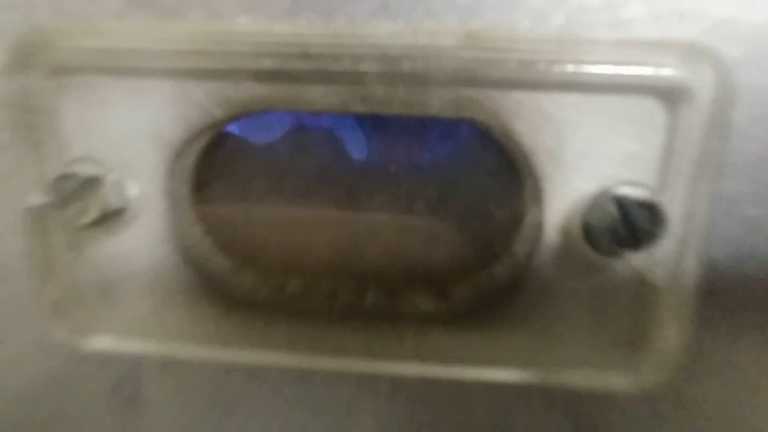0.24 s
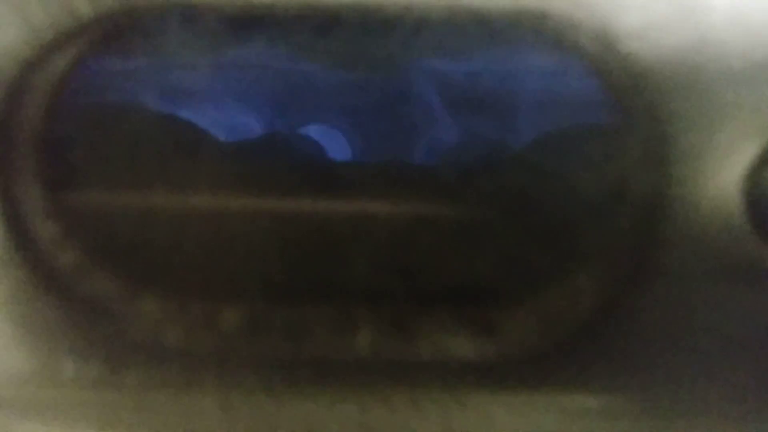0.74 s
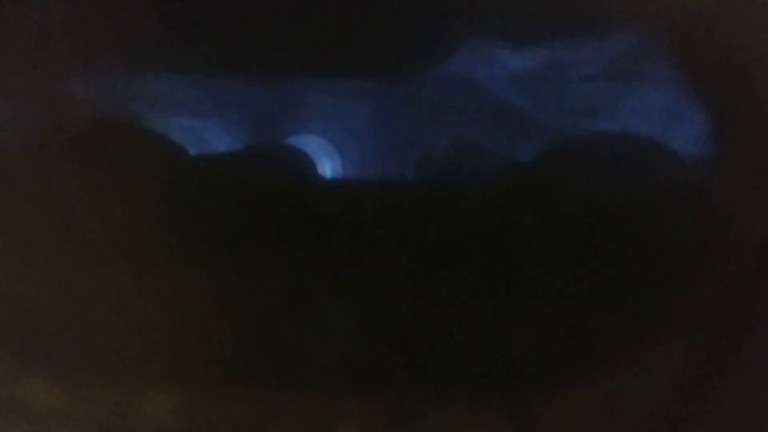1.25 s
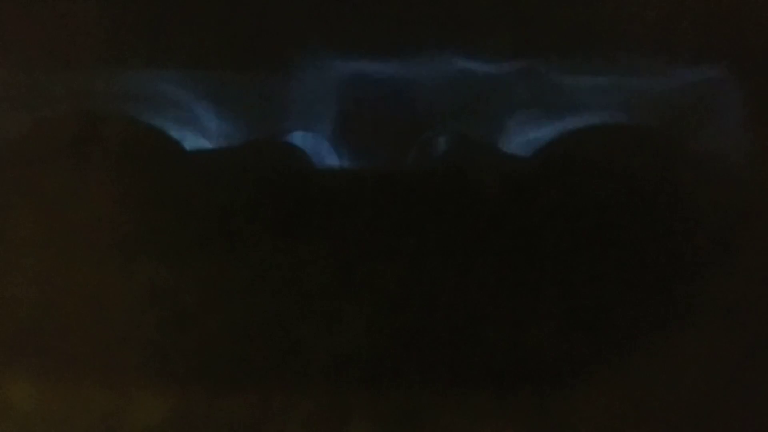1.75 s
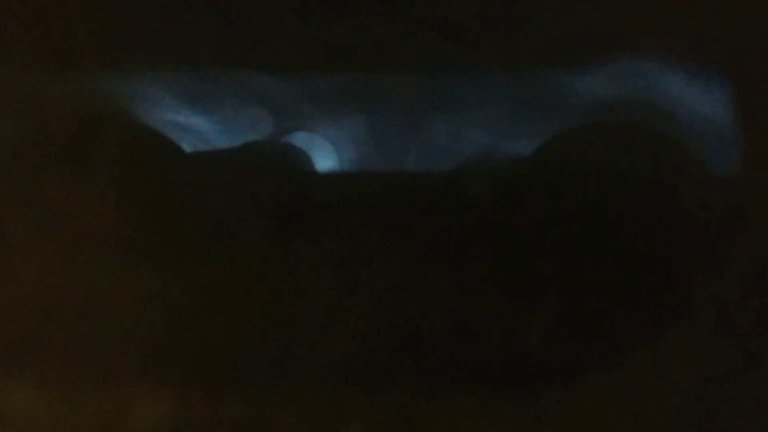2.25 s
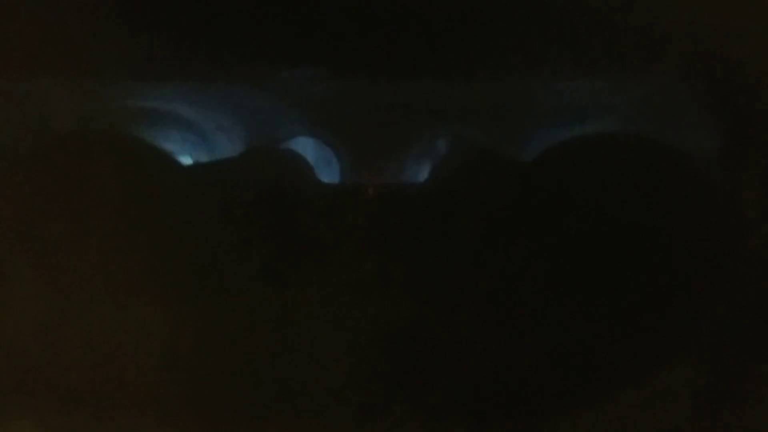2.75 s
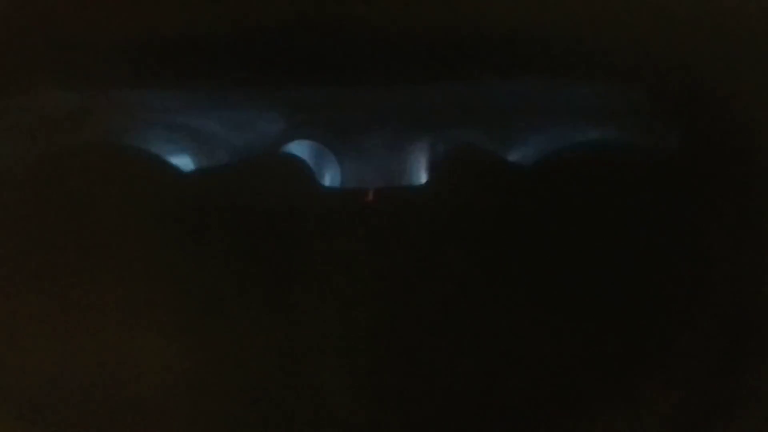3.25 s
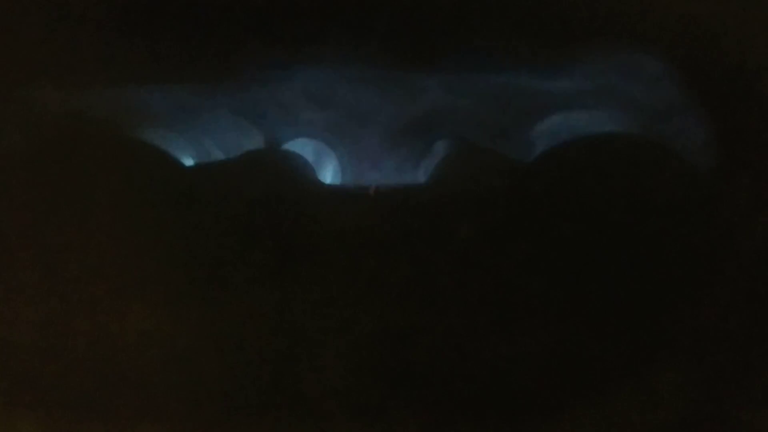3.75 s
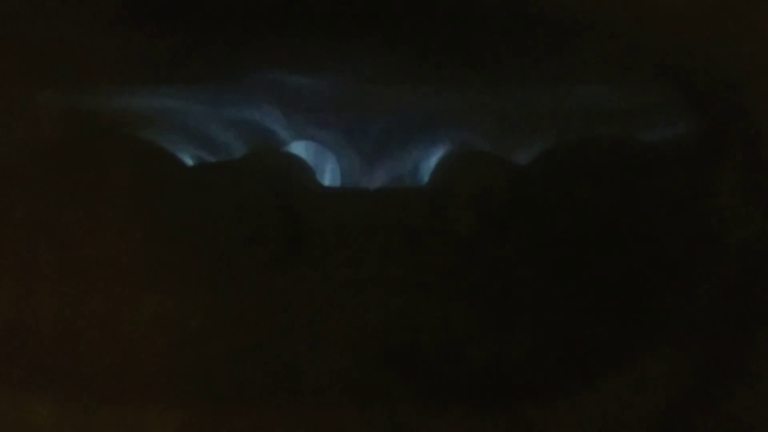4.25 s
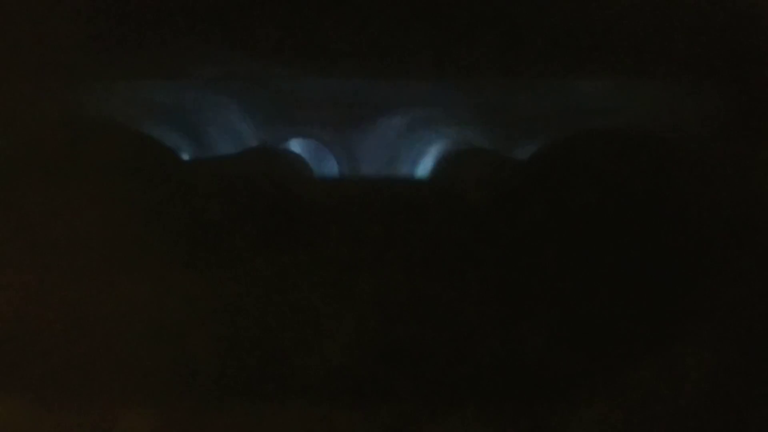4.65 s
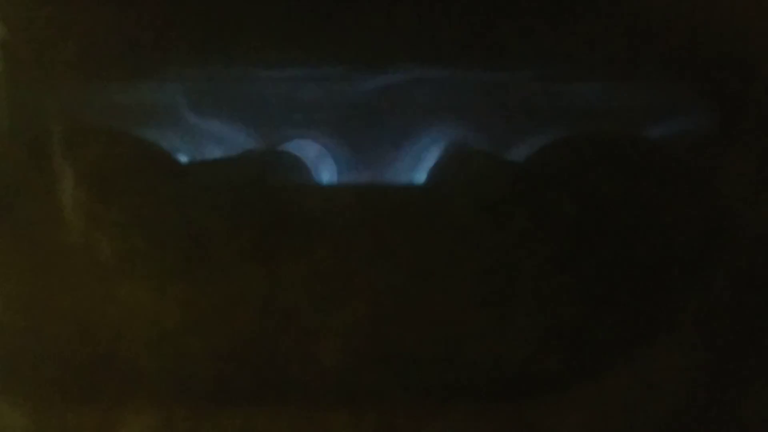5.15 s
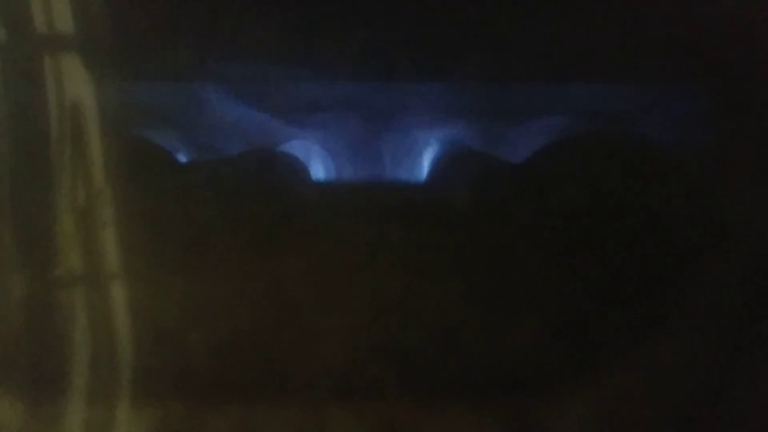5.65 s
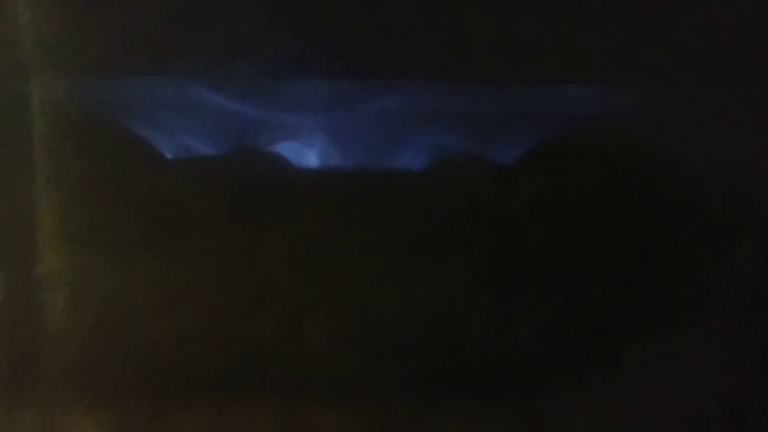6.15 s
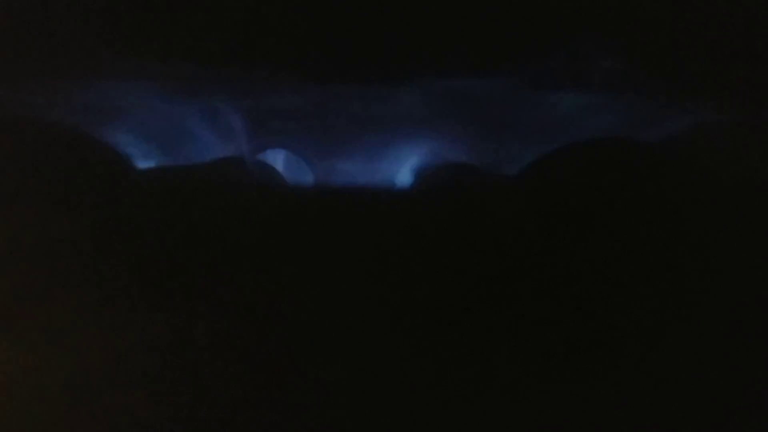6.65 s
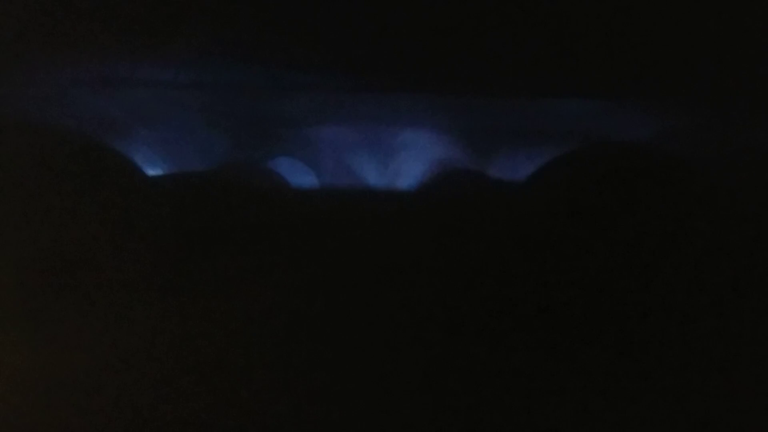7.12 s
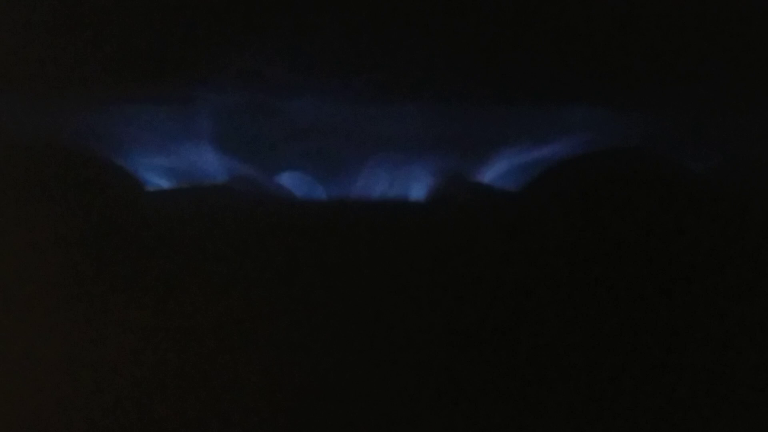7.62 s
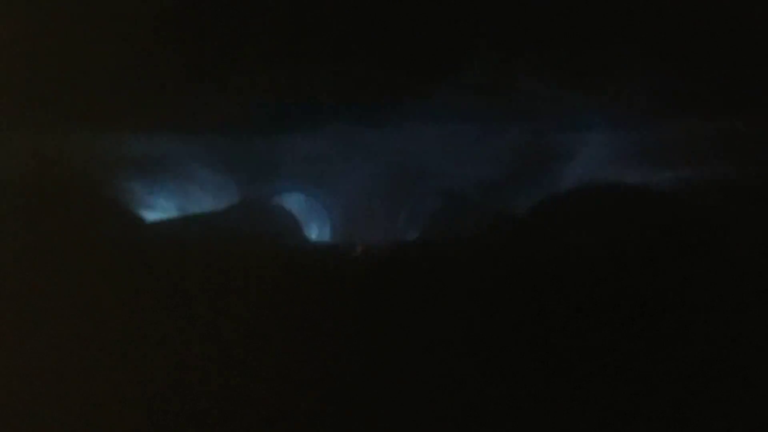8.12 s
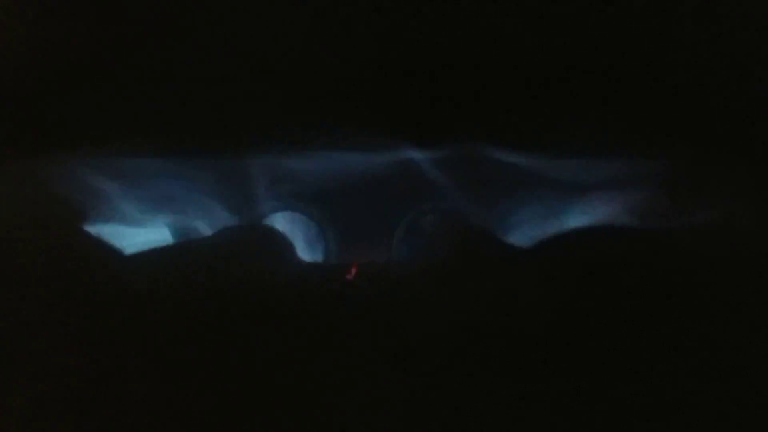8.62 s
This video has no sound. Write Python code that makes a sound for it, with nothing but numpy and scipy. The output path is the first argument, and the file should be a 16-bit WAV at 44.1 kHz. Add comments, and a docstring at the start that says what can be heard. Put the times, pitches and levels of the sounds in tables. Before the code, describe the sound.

From 0 seconds a gas furnace is in full run indoors, heard close at its sight glass: low, uneven flame rumble, rushing air, gas hiss and a steady blower whine around 610 Hz with a 120 Hz hum. Deep throbs swell at the very start. Over the first second the microphone moves in, the air rush growing louder while a brighter surface hiss fades; faint cloth strokes pass between about 0.7 and 1.9. Short booming flare-ups keep coming, notable near 1, 1.4, 2.2, 4.2 and 7.6. A narrow hollow boom is stronger around 5 to 7, dipping briefly near 5.6, then drops away. From about 5.5 the jets and rush dull a little, with light rubs at 5.7 and 6.9. A clearer cluster of soft sleeve rustles comes at 7.2 to 7.7, then a heavy throb near 8.1. The fire continues until an abrupt end near 8.9.

```python
"""Low flame rumble, rushing air, gas hiss and a blower whine start together: a furnace heard at its sight glass.
Flames, draught and jets are shaped noise ringing in the sheet-metal cabinet, with deep throbs as swelling sines.
The inducer blower adds shaken sines at its blade rate and motor hum; soft strokes of noise, as of a sleeve,
brush past the microphone. Colour and balance shift as the microphone moves."""
import sys
import numpy as np
from scipy import signal
from scipy.fft import rfft, irfft
from scipy.io import wavfile
from scipy.ndimage import uniform_filter1d, minimum_filter1d

SR = 44100
rng = np.random.default_rng(int(sys.argv[2]) if len(sys.argv) > 2 else 0)


def inscribe(sig):
    """Save sig as 16-bit PCM at rate SR to the path in sys.argv[1].

    A 1-D sig is mono; a 2-D sig holds one channel per row.
    Samples are clipped to [-1, 1] before scaling.
    """
    pcm = np.round(np.clip(np.atleast_2d(sig).T, -1, 1) * 32767)
    wavfile.write(sys.argv[1], SR, pcm.astype(np.int16))


N = 391608
TIME = np.arange(N) / SR
HZ = np.fft.rfftfreq(N, 1 / SR)


def gain_of(db):
    """Decibels to amplitude."""
    return 10 ** (np.asarray(db) / 20)


def evened(x):
    """Scales to rms 1."""
    return x / np.sqrt(np.mean(x ** 2) + 1e-20)


def read(points, hz):
    """Reads a spectrum table along a log-frequency axis."""
    point_hz, value = np.transpose(points)
    return np.interp(np.log(hz + 1), np.log(point_hz + 1), value)


def follow(rows):
    """Draws each column of a time table as a line over every sample."""
    point_s, *columns = np.transpose(rows)
    return [np.interp(TIME, point_s, column) for column in columns]


def spread(pan_db):
    """Left and right gains whose mean is 1; positive pan leans left."""
    pair = np.array([gain_of(pan_db / 2), gain_of(-pan_db / 2)])
    return pair / pair.mean(0)


def eddies(rate_hz):
    """Random wavering of rms 1: noise dulled above the given rate."""
    noise = rng.standard_normal(N)
    return evened(irfft(rfft(noise) / (1 + (HZ / rate_hz) ** 2), N))


def split(x, hz):
    """Steep crossover: the parts below and above a frequency add up to the whole."""
    low = irfft(rfft(x) / (1 + (HZ / hz) ** 20), N)
    return low, x - low


def surging(x, level_db, span_s):
    """Levels noise by its own smoothed power, then rides it in dB; flutter faster than the span survives."""
    window = signal.windows.hann(int(span_s * SR) * 2)
    power = signal.fftconvolve(x.mean(0) ** 2, window / window.sum(), "same")
    return x / np.sqrt(abs(power) + 1e-9) * gain_of(level_db)


# resonances of cabinet, heat exchanger and flue: centre_hz, width_hz, lift_db
CABINET_RESONANCES = [(70.5, 11, 5.5), (191, 18, 5), (225.7, 46, 6.5), (297.3, 34, 6.5), (359, 31.4, 6.5),
                      (638.7, 17, 8), (663, 20, 9.5), (699, 22, 8), (762, 68, 3), (858, 51.6, 6),
                      (1024, 71, 5.5), (1200, 12, 6.5), (1234.6, 39, 8), (1355, 62, 6), (1688, 44, 6),
                      (1763, 68, 4), (1970, 220, 2.5), (2308, 65, 4), (3080, 59, 2.5)]
# how alike the two microphone ports hear: frequency_hz, likeness (1 = identical)
PORT_LIKENESS = [(30, 1), (80, 0.85), (360, 0.93), (420, 0.32), (520, 0.88), (620, 0.91), (850, 0.63),
                 (1100, 0.19), (1500, 0.31), (2000, 0.1), (5000, .1), (16000, .1)]
# how far the left port leads: frequency_hz, lead_radians
PORT_LEAD = [(30, -0.5), (70, -0.24), (150, -0.06), (500, 0.5), (850, -0.4), (1050, 2), (1200, 0.5),
             (1400, 3), (1650, 3.5), (3000, 1), (6000, 1)]
# width is taken at half the lift in dB
RING_DB = sum(lift_db * .5 ** ((2 * (HZ - centre_hz) / width_hz) ** 2)
              for centre_hz, width_hz, lift_db in CABINET_RESONANCES)


def flow(spectrum, pan_db):
    """Turbulent noise rings the cabinet and reaches two ports, more alike in the bass than in the treble."""
    a, b, c, d = rng.standard_normal((4, len(HZ)))
    likeness = np.clip(read(PORT_LIKENESS, HZ), -1, 1)
    left = a + 1j * b
    stranger = c + 1j * d
    right = likeness * left + np.sqrt(1 - likeness ** 2) * stranger
    right = right * np.exp(-1j * read(PORT_LEAD, HZ))
    colour = gain_of(read(spectrum, HZ) + RING_DB)
    ports = irfft(np.array([left, right]) * spread(pan_db) * colour, N)
    return ports / np.std(ports.mean(0))  # the mean of both ports has rms 1


# left minus right across the spectrum, shared by flames, draught and fizz: frequency_hz, pan_db
PORT_BALANCE = [(60, 5), (92, 3.5), (140, 6.5), (210, 5), (330, 3), (500, 3.5), (770, 3.5), (1170, 5.5),
                (1790, -0.5), (2740, 5), (4190, -3), (6410, 0), (9810, 8.5), (15000, -1.5)]
# relative colour of the fire: frequency_hz, density_db (per Hz)
FLAME_SPECTRUM = [(20.0, -44.5), (32.0, -40.5), (45.0, -23), (56.0, -6.5), (70.0, -8), (112, -2.5),
                  (130, -7.5), (155, -5.5), (210.0, -16), (270.0, -19.5), (390.0, -14), (460.0, -22),
                  (560.0, -23), (900.0, -52.5), (2000.0, -95.5), (5000, -140)]
# drift of the fire, band by band: time_s, rumble_db, body_db, upper_body_db, roar_db
FIRE_LEVEL_DRIFT = [(0.0, -24, -24.5, -28.5, -27), (0.7, -26, -24.5, -25, -27.5),
                    (1.15, -25, -24.5, -23.5, -27), (2.1, -23.5, -23.5, -25, -27),
                    (3.0, -24, -22, -23, -26), (4.3, -24.5, -24, -24, -27.5), (4.75, -24, -24, -22.7, -27),
                    (4.95, -28, -27, -25, -25.5), (5.2, -25, -28, -22.5, -27),
                    (5.9, -23, -22.3, -25, -26.2), (6.6, -25, -22, -23, -27.5),
                    (6.87, -24.5, -22.5, -25.5, -27.5), (6.95, -24, -30, -22, -26.5),
                    (7.05, -24.5, -20, -22.5, -25.5), (7.35, -22.5, -23.5, -24.5, -27.5),
                    (7.7, -22, -19.5, -19.5, -26.5), (8.1, -24, -20, -22, -27),
                    (8.88, -21.3, -18.5, -25.5, -29.5)]
# flames flare up and boom in the heat exchanger: peak_s, lift_db
FLARE_UPS = [(.79, 8.5), (1.01, 10), (1.42, 9), (1.54, 4), (1.73, 4.5), (2.16, 10.5), (2.93, 4.5),
             (3.04, 5.5), (3.47, 7), (3.81, 4), (4.25, 11), (5.09, 6), (5.28, 3), (6.29, 3), (6.68, 4),
             (7.57, 9), (7.89, 4), (8.35, 3.5), (8.48, 3.5)]
# relative colour of the exchanger's narrow boom: frequency_hz, density_db (per Hz)
BOOM_SPECTRUM = [(60, -65.5), (105, -31), (121, -10), (130, 3), (136, -0.5), (148, -8.5), (170, -31.5),
                 (300, -79.5), (1000, -140)]
# level of the boom before flares, falling away for about a second: time_s, level_db
BOOM_LEVEL_DRIFT = [(0, -27.5), (.6, -25.5), (1.4, -22), (2.4, -24), (2.9, -21.5), (3.4, -22.5), (4.0, -22),
                    (4.9, -21), (5.1, -18.5), (5.4, -17), (5.65, -32), (5.85, -19), (6.1, -27), (6.3, -17),
                    (6.85, -17), (6.96, -39), (8.05, -34), (8.3, -20), (8.88, -26)]


def flames(rumble_hz=88, body_hz=148, roar_hz=260, surge_s=0.16, surge_hz=7, flare_half_width_s=0.024,
           low_surge_db=1.1, roar_surge_db=0.33, boom_surge_db=1.5, boom_pan_db=8):
    """Combustion noise surges apart in four bands; a narrow exchanger boom joins, and flares lift it and the body."""
    rumble_db, body_db, upper_db, roar_db = follow(FIRE_LEVEL_DRIFT)
    boom_db, = follow(BOOM_LEVEL_DRIFT)
    flare_db = sum(lift_db * np.exp(-((TIME - peak_s) / flare_half_width_s) ** 2)
                   for peak_s, lift_db in FLARE_UPS)
    rumble, rest = split(flow(FLAME_SPECTRUM, read(PORT_BALANCE, HZ)), rumble_hz)
    body, rest = split(rest, body_hz)
    upper, roar = split(rest, roar_hz)
    boom = flow(BOOM_SPECTRUM, np.full(len(HZ), boom_pan_db))
    parts = [(rumble, rumble_db, low_surge_db),
             (body, body_db + flare_db, low_surge_db),
             (upper, upper_db, low_surge_db),
             (roar, roar_db, roar_surge_db),
             (boom, boom_db + flare_db, boom_surge_db)]
    return sum(surging(part, level_db + depth_db * eddies(surge_hz), surge_s)
               for part, level_db, depth_db in parts)


# deep throbs of the fire, rms level at the crest before panning: crest_s, half_width_s, level_db
FIRE_THROBS = [(.05, .05, -22), (.17, 0.044, -18), (.32, 0.045, -19), (1.13, 0.049, -18), (1.61, .05, -18),
               (2.01, 0.11, -19), (2.54, 0.066, -21.5), (3.04, 0.039, -19), (3.43, 0.044, -21),
               (3.88, .06, -21), (6.03, 0.081, -20), (6.23, .04, -16), (6.59, .07, -19.5), (8.07, .07, -15)]


def throbs(throb_hz=72, pan_db=4.3):
    """A surge of the fire sets the lowest cabinet resonance swinging: a sine under a bell-shaped swell."""
    out = np.zeros(N)
    phases = rng.random(len(FIRE_THROBS))  # in turns
    for (crest_s, half_width_s, level_db), phase in zip(FIRE_THROBS, phases):
        swell = gain_of(level_db) * np.exp(-((TIME - crest_s) / half_width_s) ** 2)
        out += swell * np.sqrt(2) * np.sin(2 * np.pi * (throb_hz * TIME + phase))
    return spread(pan_db)[:, None] * out


# relative colour of the drawn air: frequency_hz, density_db (per Hz)
DRAUGHT_SPECTRUM = [(350.0, -61), (560.0, -16.5), (620.0, -0.5), (730.0, -5.5), (1250.0, -6), (1450.0, -8),
                    (1800.0, -16.5), (2500.0, -32.5), (6000.0, -81)]
# air rush before its trim, loudest with the microphone right at the glass: time_s, level_db
RUSH_LEVEL = [(0.0, -29.5), (0.55, -28.5), (1.0, -24.5), (1.7, -24), (4.0, -24.5), (5.3, -25), (6.1, -28),
              (7.2, -26.5), (8.88, -26.5)]


def draught(trim_db=2.0, flue_hz=740, flue_db=-25.5):
    """Air drawn through the cabinet: low flue noise holds level while the upper rush depends on where one stands."""
    rush_db, = follow(RUSH_LEVEL)
    flue, rush = split(flow(DRAUGHT_SPECTRUM, read(PORT_BALANCE, HZ)), flue_hz)
    return flue * gain_of(flue_db) + rush * gain_of(rush_db + trim_db)


# relative colour of the burner jets: frequency_hz, density_db (per Hz)
JET_SPECTRUM = [(700.0, -37.5), (1400.0, -3.5), (1900.0, 1), (2700.0, -1.5), (3500.0, -13.5),
                (4500.0, -25.5), (9000.0, -61), (11500, -60.5), (14000, -47), (16000, -46.5)]
# jets before their trim, shaded once the microphone shifts aside: time_s, level_db, pan_db (left minus right)
JET_LEVEL_DRIFT = [(0.0, -37, 4), (.6, -38, 7), (1.0, -36, 6.5), (3.3, -36, 6), (4.8, -36.5, 5.6),
                   (5.35, -36.5, 5.4), (5.7, -39, -2), (7.1, -39.5, 0.5), (7.7, -40.5, 6), (8.4, -40, 3),
                   (8.88, -39.5, 4)]
# relative colour of the fine gas hiss: frequency_hz, density_db (per Hz)
FIZZ_SPECTRUM = [(1500.0, -43), (3500.0, 0), (4500.0, -4), (6000.0, -5.5), (7500.0, -12), (8500.0, -20),
                 (10000.0, -39.5), (12000.0, -36), (14000.0, -29.5), (16000.0, -28.5)]
# gains of the fizz before its wavering: time_s, lower_and_middle_db, top_db
FIZZ_LEVEL_DRIFT = [(0, -52.5, -53), (1, -48.5, -49), (2.6, -50.5, -50), (3.7, -49.5, -48),
                    (4.5, -49.5, -49.5), (5.3, -49.5, -48.5), (6.2, -49.5, -52), (7, -48.5, -50),
                    (8.0, -49.5, -51.5), (8.75, -51, -49.5)]
# relative colour of the brighter hiss in front of the panel: frequency_hz, density_db (per Hz)
PANEL_SPECTRUM = [(1900, -30), (2500, 4), (2900, 7.5), (3300, 3.5), (3900, 4.5), (4700, -9), (6000, -20.5),
                  (7700, -10), (10000, -36), (12500, -28), (16000, -25.5)]
# panel hiss before gusts, fading as the microphone reaches the glass: time_s, level_db
PANEL_LEVEL_DRIFT = [(0, -42.5), (.6, -45), (1.3, -47.5), (1.6, -71.5), (8.88, -83.5)]


def jets(trim_db=2, gust_db=0.59, gust_hz=12, panel_pan_db=7, shade_hz=2450, shade_share=.4,
         fizz_split_hz=4600, top_split_hz=6800, waver_db=0.9, waver_hz=5):
    """Gas hisses out of the orifices, gusting as a whole, while each band of its fine fizz wavers on its own."""
    level_db, pan_db = follow(JET_LEVEL_DRIFT)
    centred = np.zeros(len(HZ))
    dull, bright = split(flow(JET_SPECTRUM, centred), shade_hz)
    shade_db = shade_share * (level_db - level_db.max())  # the bright part is shaded most
    body = (dull + bright * gain_of(shade_db)) * spread(pan_db) * gain_of(level_db + trim_db)

    low, rest = split(flow(FIZZ_SPECTRUM, read(PORT_BALANCE, HZ)), fizz_split_hz)
    middle, top = split(rest, top_split_hz)
    fizz_db, top_db = follow(FIZZ_LEVEL_DRIFT)
    bands = [(low, fizz_db), (middle, fizz_db), (top, top_db)]
    fizz = sum(band * gain_of(band_db + waver_db * eddies(waver_hz)) for band, band_db in bands)

    panel_db, = follow(PANEL_LEVEL_DRIFT)
    panel = flow(PANEL_SPECTRUM, centred + panel_pan_db) * gain_of(panel_db)
    return (body + fizz + panel) * gain_of(gust_db * eddies(gust_hz))


# tones of 11 blades and 18 rotor bars, level before the blower drift, shading and panning:
# shaft_order, mains_order, level_db, flutter_share
BLOWER_TONES = [(11, 0, -23.5, 0.15), (22, 0, -47.5, 0.82), (0, 2, -34.5, 0.12), (0, 8, -47, 0.075),
                (0, 10, -42.5, 0.11), (18, -2, -40.5, 0.6), (18, 0, -41.5, 0.33), (19, 0, -50.5, 0.17),
                (18, 2, -38.5, 0.31), (19, 2, -43, 0.6), (18, 4, -50.5, .2)]
# drift applied to all the tones: time_s, offset_db
BLOWER_LEVEL_DRIFT = [(0, 0.29), (1.2, 0.62), (3, 0.2), (5, 0.31), (6.2, -0.52), (7.5, -0.94),
                      (8.88, -0.73)]


def blower(shaft_hz=55.56, mains_hz=60, flutter_hz=9, pan_db=8.0, shade_share=0.48, shade_above_hz=800):
    """Blade tones and magnetic hum at constant speed; eddies at the wheel shake each tone in level and phase."""
    out = np.zeros(N)
    # high tones come through the glass, fading with the air rush when the microphone moves aside
    rush_db, = follow(RUSH_LEVEL)
    shade = gain_of(shade_share * (rush_db - rush_db.mean()))
    for shaft_order, mains_order, level_db, flutter_share in BLOWER_TONES:
        pitch_hz = shaft_order * shaft_hz + mains_order * mains_hz
        shake = 1 + flutter_share * (eddies(flutter_hz) + 1j * eddies(flutter_hz))
        carrier = np.exp(2j * np.pi * (pitch_hz * TIME + rng.random()))
        tone = evened((shake * carrier).real)
        out += gain_of(level_db) * tone * (shade if pitch_hz > shade_above_hz else 1)
    offset_db, = follow(BLOWER_LEVEL_DRIFT)
    return spread(pan_db)[:, None] * out * gain_of(offset_db)


# soft strokes, as of a sleeve, gains at full speed before catching:
# middle_s, length_s, hiss_db, centre_hz, air_db, pan_db (left minus right)
SLEEVE_BRUSHES = [(.8, .28, -51, 5000, -73, -5), (1.33, .08, -58, 7000, -62, 8),
                  (1.39, .16, -50, 5800, -72, -5), (1.497, .2, -49, 5700, -65, -7),
                  (1.8, .14, -57, 5600, -79, -3), (5.65, .14, -51, 3700, -80, 0),
                  (5.8, .1, -50, 3800, -80, -3), (6.92, .18, -54, 4400, -77, 2),
                  (7.323, 0.23, -44.5, 5030, -64, -4), (7.448, 0.27, -47, 4100, -66, -3),
                  (7.49, 0.33, -42.5, 6400, -49, 0), (7.59, .08, -43, 5300, -58, -3),
                  (7.63, 0.23, -45, 6600, -50, 1)]
# relative colour of the rubbing cloth: frequency_ratio (times the stroke's centre_hz), density_db (per Hz)
CLOTH_HISS_SPECTRUM = [(.3, -43), (.55, -8.5), (.75, -5.5), (1, 0), (1.2, -6), (1.42, -16.5), (1.65, -32),
                       (2.5, -59)]
# relative colour of the cloth's airy top: frequency_hz, density_db (per Hz)
CLOTH_AIR_SPECTRUM = [(6000, -44.5), (9000, -13.5), (10400, -22.5), (12200, -9), (13500, -5), (15200, 1.5),
                      (16000, -3.5)]


def sleeve(air_pan_db=5.0, hiss_power=1.5, air_power=1.4, catch_db=1.0, catch_hz=30):
    """Cloth speeds up, slows and catches unevenly; strokes hiss at their own pitch, airy top opening with speed."""
    air = flow(CLOTH_AIR_SPECTRUM, np.full(len(HZ), air_pan_db))
    out = np.zeros((2, N))
    for middle_s, length_s, hiss_db, centre_hz, air_db, pan_db in SLEEVE_BRUSHES:
        at = np.flatnonzero(abs(TIME - middle_s) < length_s / 2)
        speed = abs(np.cos(np.pi * (TIME[at] - middle_s) / length_s))
        hiss_spectrum = np.multiply(CLOTH_HISS_SPECTRUM, [centre_hz, 1])
        hiss = flow(hiss_spectrum, np.zeros(len(HZ)))[:, at]
        stroke = gain_of(hiss_db) * hiss * speed ** hiss_power
        stroke += gain_of(air_db) * air[:, at] * speed ** air_power
        out[:, at] += spread(pan_db)[:, None] * stroke
    return out * gain_of(catch_db * eddies(catch_hz))


def scene():
    """Flames and their throbs, draught, gas jets and blower together, and the brushing sleeve."""
    return flames() + throbs() + draught() + jets() + blower() + sleeve()


def record(dry, edge_hz=15850):
    """A smooth limiter holds peaks over full scale; then very short fades at the ends and a low-pass."""
    headroom = 1 / np.maximum(abs(dry).max(0), 1)
    held = minimum_filter1d(headroom, size=600)
    gain = uniform_filter1d(uniform_filter1d(held, size=300), size=300)
    ends = signal.windows.tukey(N, .0005)
    low_pass = signal.firwin(511, edge_hz, window=("kaiser", 9), fs=SR)
    return signal.oaconvolve(dry * gain * ends, low_pass[None], "same")


dry = scene()
out = record(dry)
inscribe(out)
```